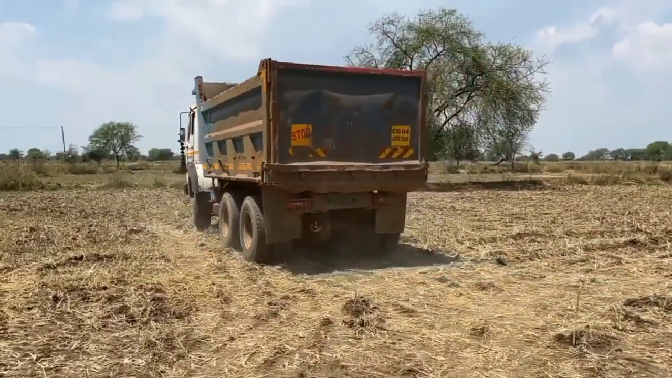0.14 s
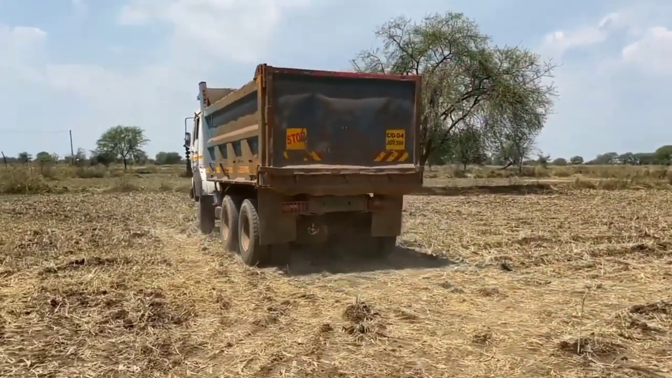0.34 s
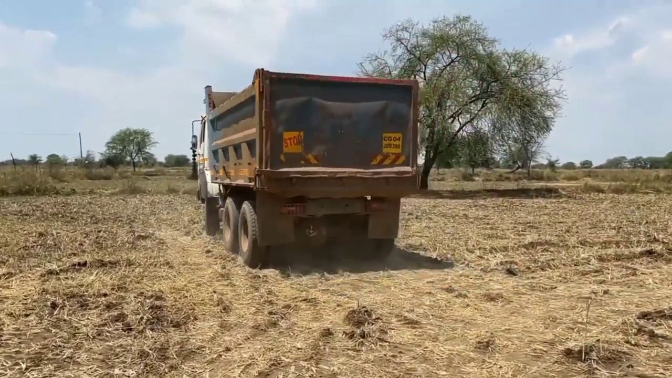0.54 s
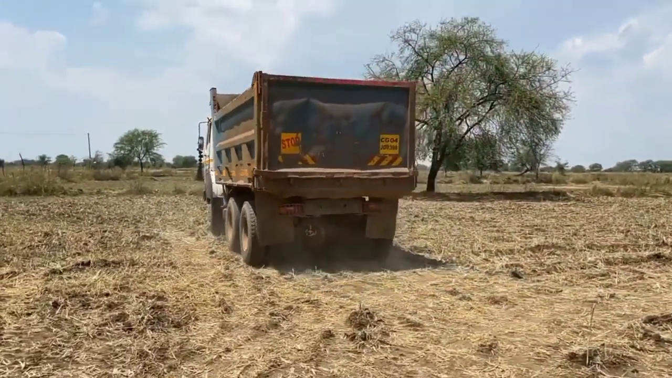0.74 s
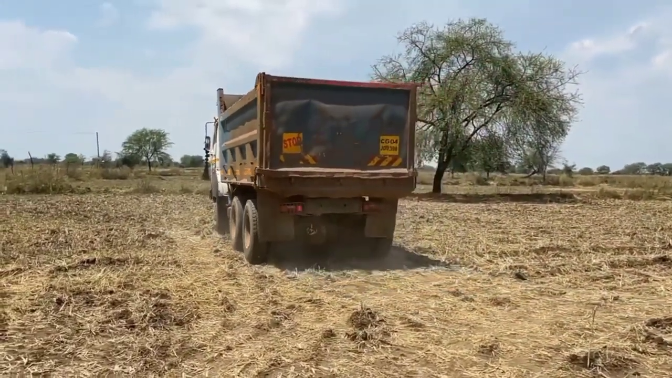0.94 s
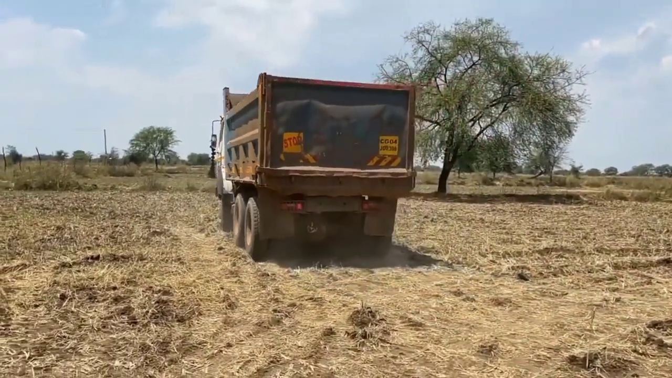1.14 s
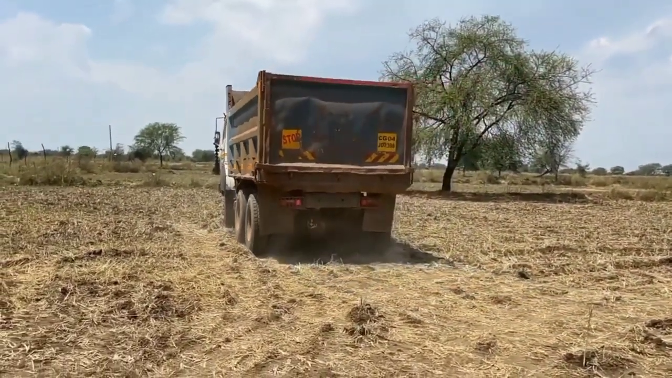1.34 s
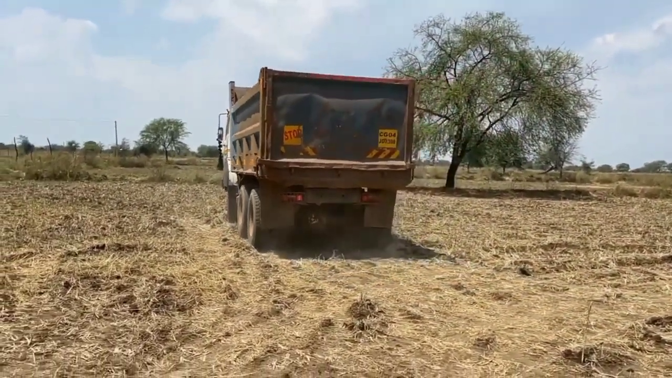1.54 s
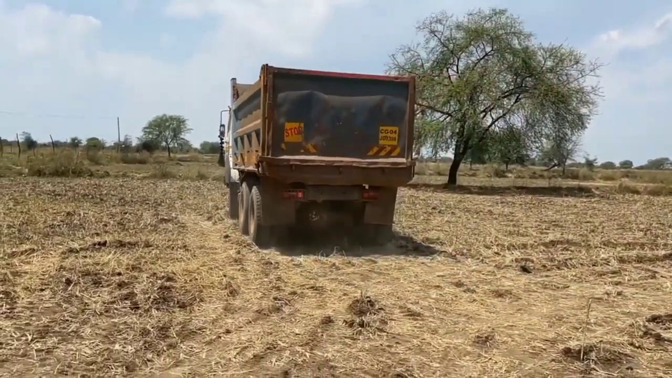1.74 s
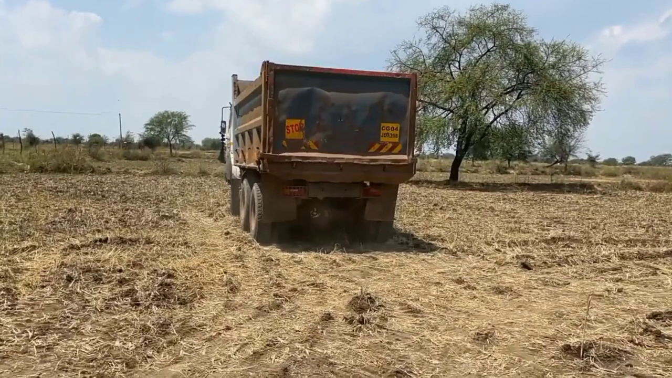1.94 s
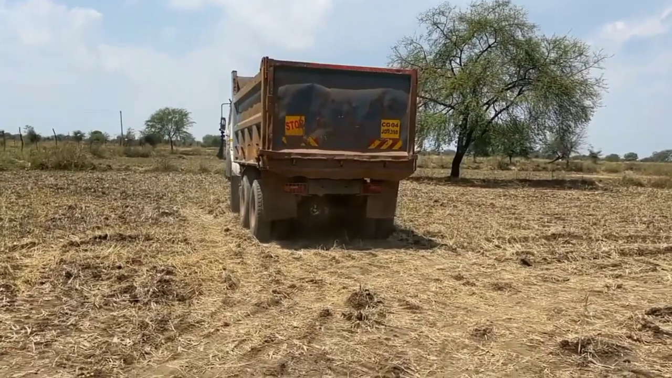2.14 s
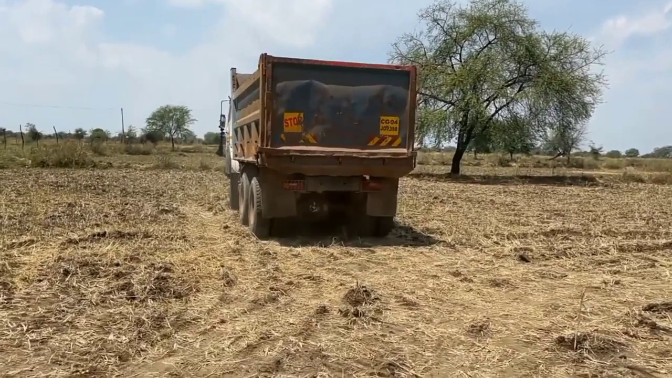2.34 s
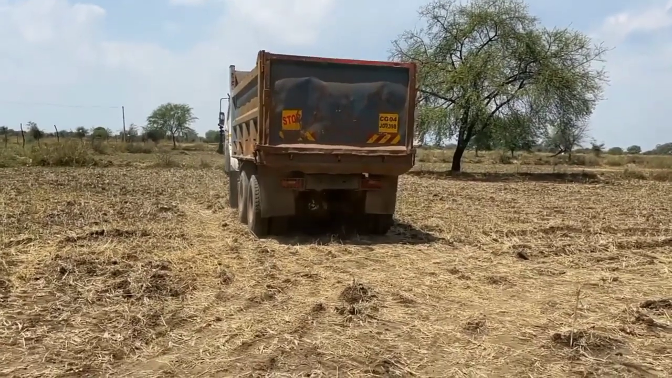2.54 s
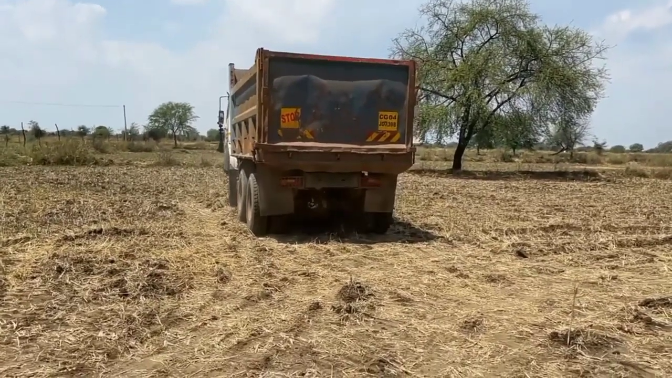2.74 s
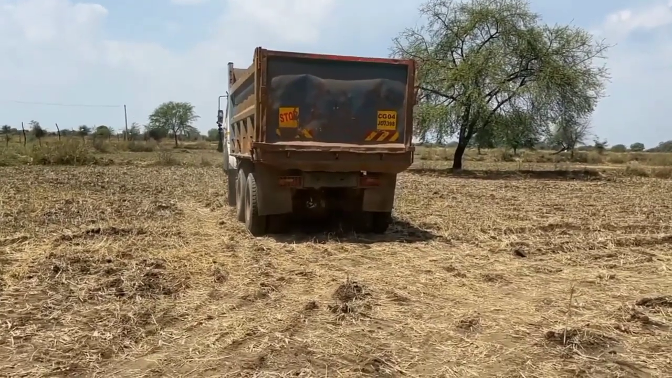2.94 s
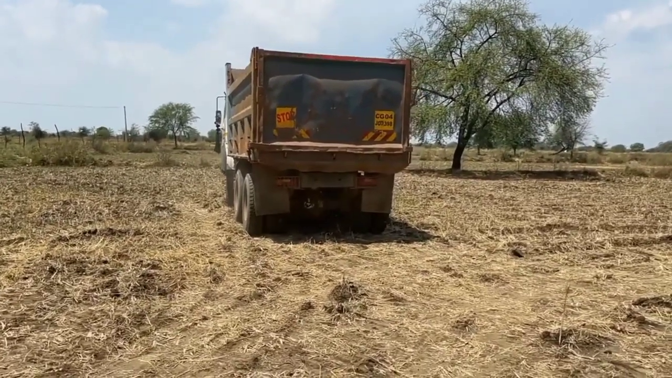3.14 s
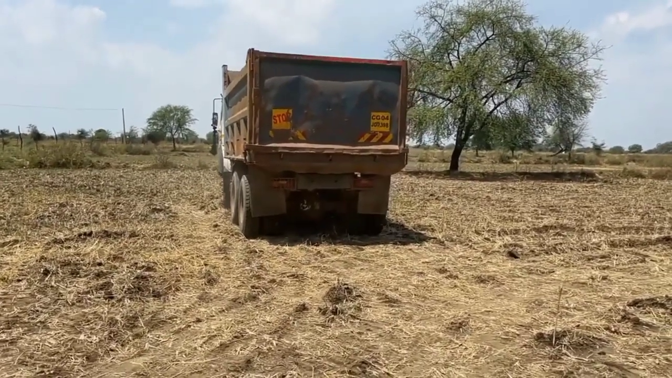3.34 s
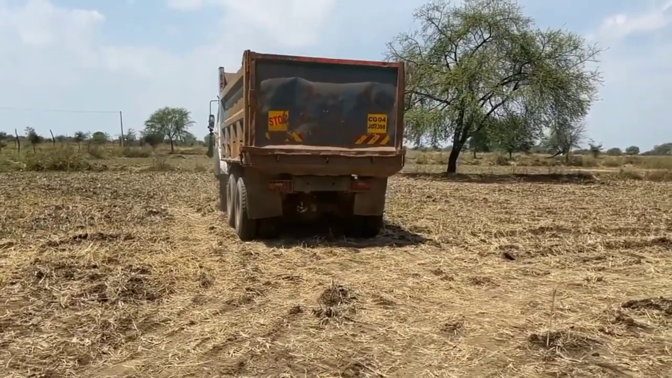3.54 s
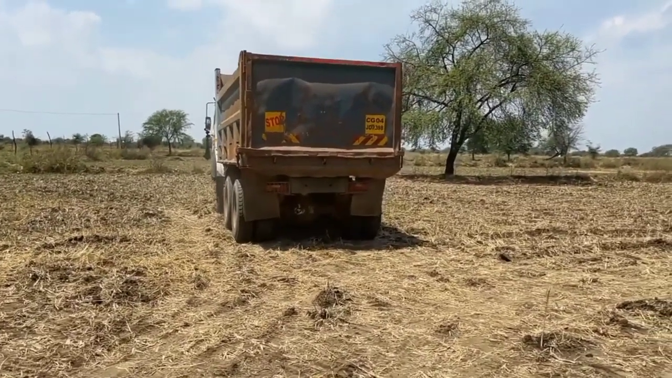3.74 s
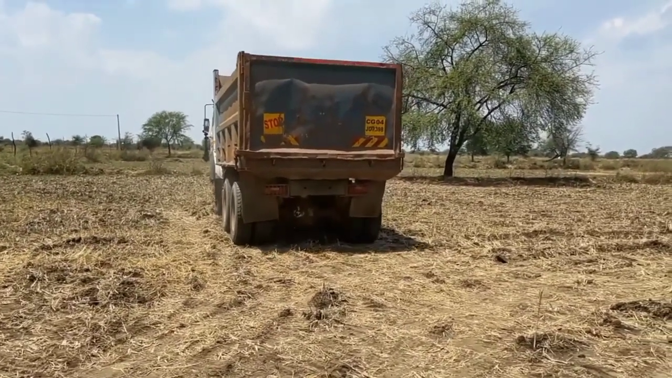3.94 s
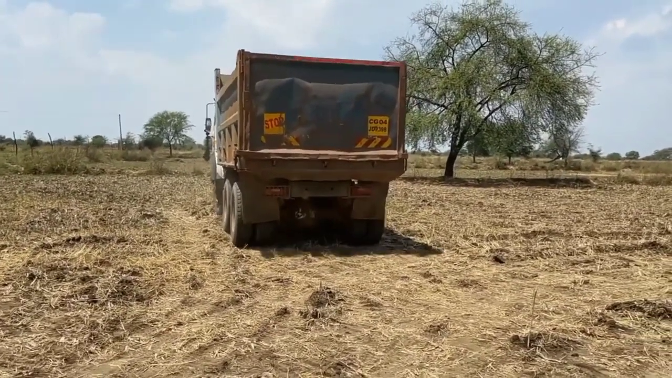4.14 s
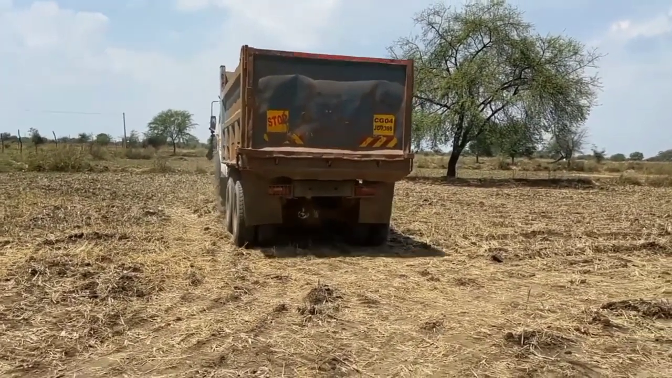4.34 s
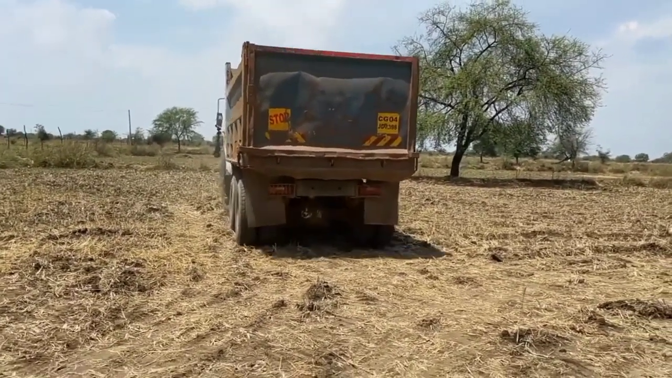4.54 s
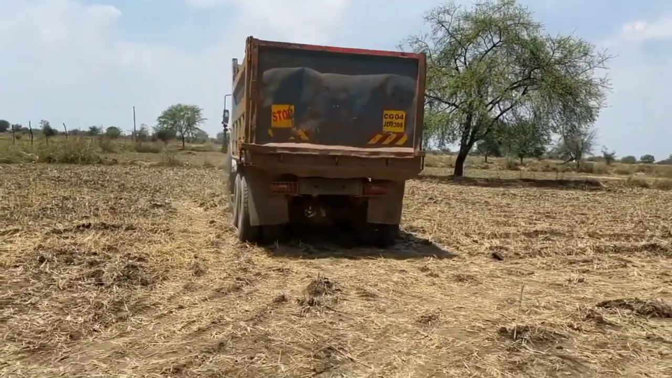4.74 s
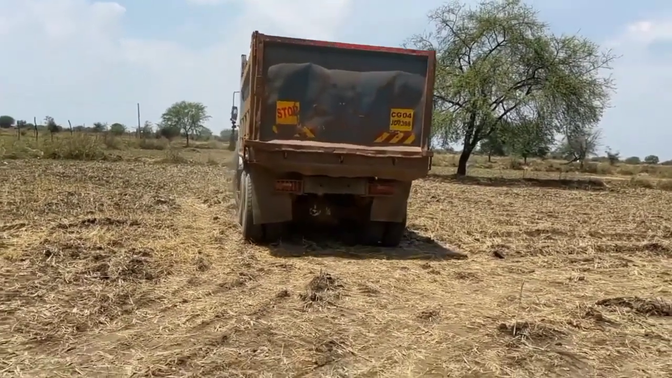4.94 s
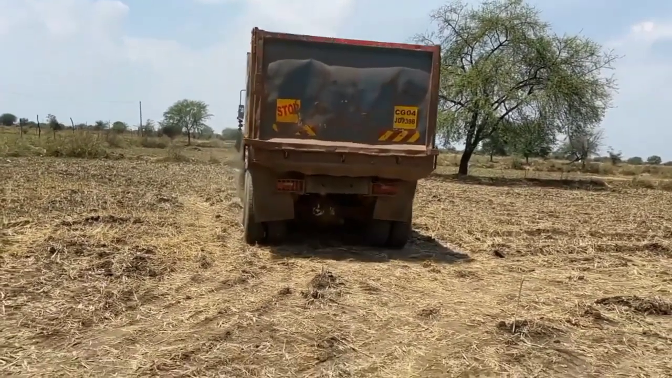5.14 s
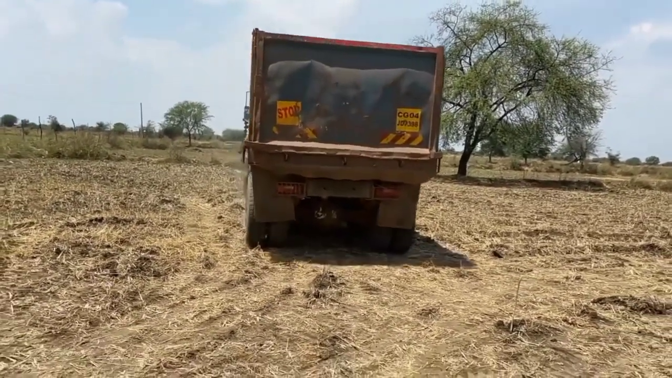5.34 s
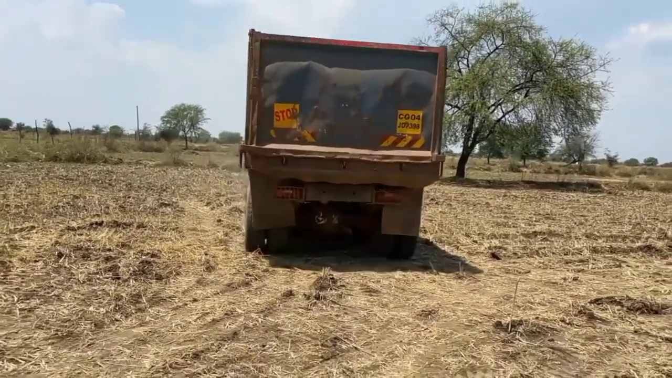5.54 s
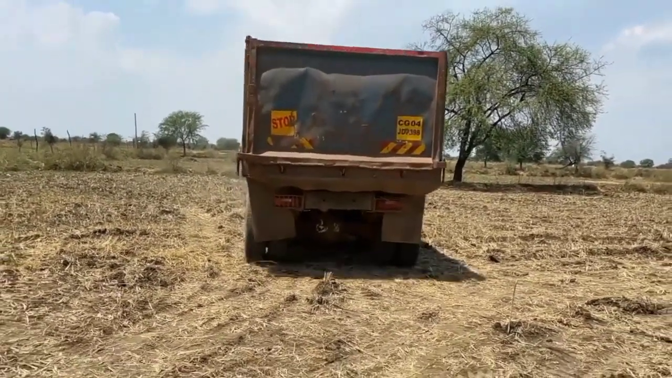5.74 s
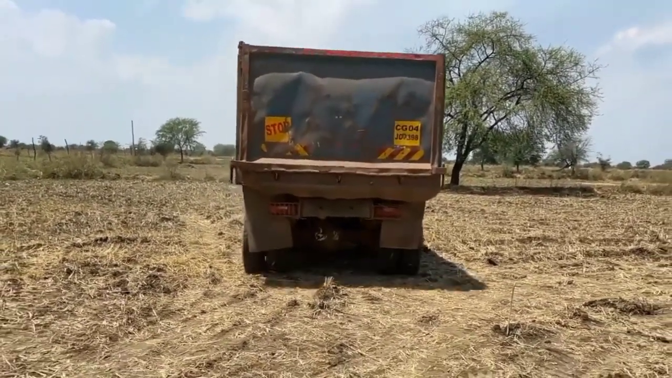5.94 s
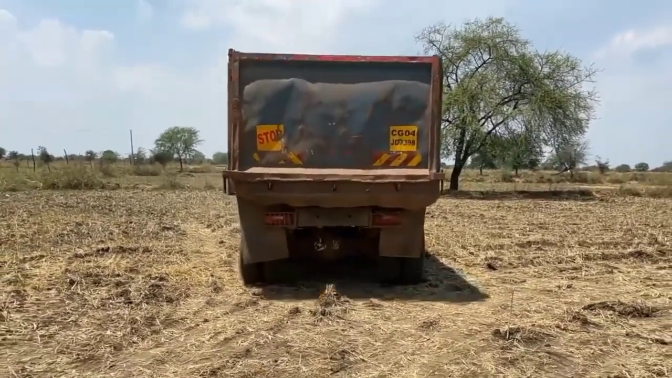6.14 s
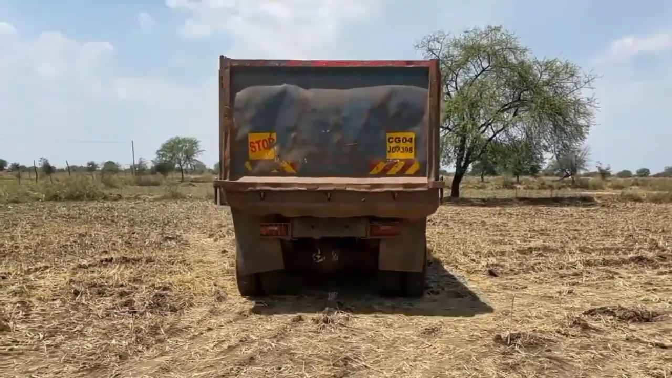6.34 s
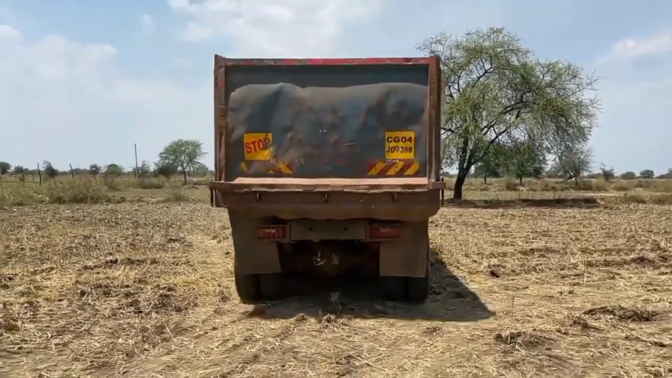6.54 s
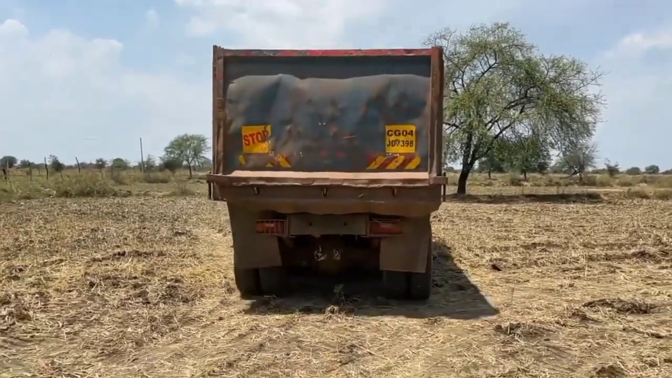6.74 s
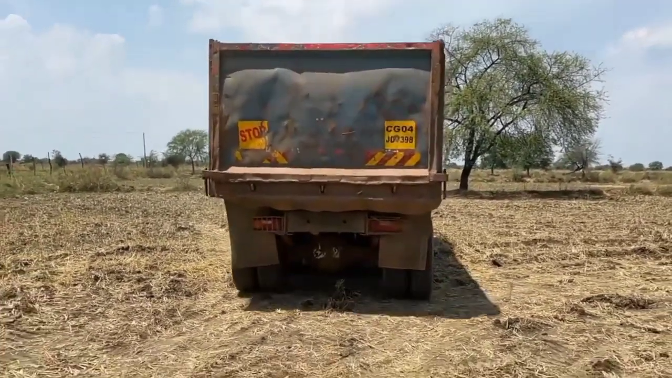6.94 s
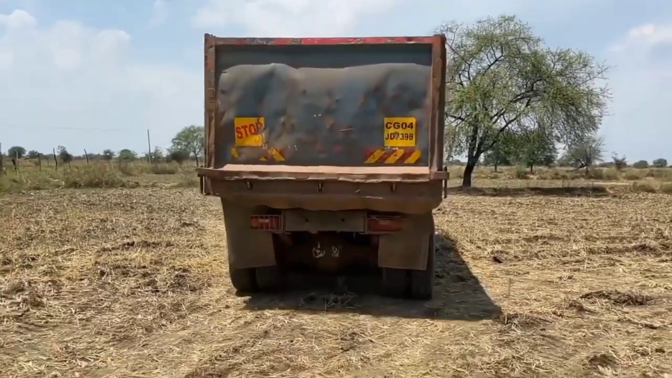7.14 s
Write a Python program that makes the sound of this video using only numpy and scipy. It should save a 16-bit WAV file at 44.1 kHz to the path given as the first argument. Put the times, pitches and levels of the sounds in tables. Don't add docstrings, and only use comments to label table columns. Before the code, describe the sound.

A big diesel truck booms and clatters close by in an open field, panels rattling and dry straw snapping. It eases off and fades, the brake gives a very short squeal, and the engine sinks to a low, slow throb. A metal clank and tailgate bounce follow as reverse engages, then the engine rises again and comes closer. A second engine idles faintly further off. Handheld outdoor microphone, no echo.

```python
import sys
import numpy as np
from scipy import signal
from scipy.io import wavfile
from scipy.ndimage import uniform_filter1d

SR = 44100
rng = np.random.default_rng(int(sys.argv[2]) if len(sys.argv) > 2 else 0)


def volts(x):
    e = np.asarray(x, float) / 20
    return 10 ** e


def put_to_file(sound):
    columns = np.atleast_2d(sound).T
    safe = np.clip(columns, -1, 1)
    whole_steps = np.round(safe * 32767)
    wavfile.write(sys.argv[1], SR, whole_steps.astype(np.int16))


N = 316638
T = np.arange(N) / SR
ROAR_DB, ROAR_SHARE = -36.5, 0.93

# time_s, throttle_db, nearness_db
DRIVING = [(0, -1.5, 2.5), (.96, -1.5, 0), (1.04, -19, -2.5), (1.4, -21, -6), (1.7, -15.5, -6),
           (1.86, -25, -7.5), (2.1, -7, -8), (2.55, -11.5, -11), (2.88, -28, -10.5), (3.1, -1, -5.5),
           (3.7, -11, -6), (3.95, -7, -4.5), (4.86, -2, -1), (5.02, -31, -6), (5.15, -4, -2),
           (5.3, -2.5, -0.5), (5.55, -1.5, 1.5), (5.82, 3, 1.5), (6.55, 3, 4.5), (7.18, -4, 2.5)]
# time_s, pitch_hz, level_db
SQUEAL = [
    (1.75, 1720, -52),
    (1.765, 1735, -41),
    (1.79, 1738, -37),
    (1.814, 1760, -44),
    (1.82, 1930, -38),
    (1.832, 1955, -35),
    (1.848, 1950, -39),
    (1.885, 1942, -48),
    (1.93, 1940, -60),
]


def evened(x):
    return x / np.sqrt(np.mean(x ** 2) + 1e-20)


def curves(rows, t):
    s, *columns = np.transpose(rows)
    return [np.interp(t, s, c) for c in columns]


def add(mix, s, sound):
    part = mix[round(s * SR):][:len(sound)]
    part += sound[:len(part)]


def drift(hz, t=T):
    steps = uniform_filter1d(rng.standard_normal(2000), size=3)
    return evened(np.interp(t * hz * 3, np.arange(2000), steps))


def ring(x, hz, width):
    pole = np.exp((2j * np.pi * hz - np.pi * width) / SR)
    return 2 * signal.lfilter([1 - abs(pole)], [1, -pole], x).real


def resonance(x, hz, width):
    return evened(ring(ring(x, hz, width), hz, width))


def noise(spectrum, patchy_db, size, streak_db=0):
    hz = np.fft.rfftfreq(size, 1 / SR)
    a, b, patches = rng.standard_normal((4 * N // size + 8, len(hz), 3)).T
    streaks = evened(uniform_filter1d(patches[::-1], size=24, axis=1))
    patches = uniform_filter1d(patches, size=8, axis=0)
    patches = evened(uniform_filter1d(patches, size=6, axis=1))
    f, db = np.transpose(spectrum)
    shape = np.interp(np.log(hz + 1), np.log(f + 1), db)[:, None]
    z = (a + 1j * b) * volts(shape + patchy_db * patches + streak_db * streaks)
    return evened(signal.istft(z, nperseg=size, noverlap=3 * size // 4)[1][:N])


def puffs(turns, decay, spread_db):
    strength = volts(spread_db * rng.standard_normal(1000))[turns.astype(int)]
    phase = turns % 1
    return evened(strength * phase * np.exp(-phase / decay))


def truck():
    # frequency_hz, density_db
    roar_spectrum = [(41, -44), (66, -8), (86, -12.5), (107, -18.5), (183, -17), (280, -19.5), (346, -24),
                     (438, -31.5), (620, -27), (810, -53), (1360, -120)]
    # frequency_hz, density_db
    clatter_spectrum = [(260, -45), (450, -2.5), (586, -8.5), (638, -2), (694, 0), (755, -6.5), (852, -7.5),
                        (1140, -5.5), (1670, -12), (2370, -16), (3240, -21), (4600, -22.5), (5920, -30.5),
                        (6840, -29.5), (8000, -34.5), (10400, -49.5), (17600, -120)]
    tones, turns = exhaust()
    near_db = curves(DRIVING, T)[1]

    roar = noise(roar_spectrum, patchy_db=1.5, size=2048)
    roar *= evened(1 + .35 * puffs(turns, .25, spread_db=1.5))
    lurch_db = 0.1 * drift(3)
    roar *= volts(ROAR_DB + ROAR_SHARE * near_db + lurch_db)

    knock = evened(4.5 + 0.19 * puffs(turns, 0.13, spread_db=9.0)) * volts(0.72 * drift(hz=14))
    clatter = noise(clatter_spectrum, patchy_db=2.0, size=1024, streak_db=3.5) * knock
    clatter *= volts(-45 + 0.43 * near_db)
    return tones + roar + clatter


def exhaust():
    # time_s, rate_hz
    speed = [(0, 60.4), (.3, 58.34), (.58, 60.8), (.98, 57.6), (1.06, 55.8), (1.42, 47.5), (1.64, 44.78),
             (1.9, 38.4), (2.5, 36.6), (2.86, 32.9), (3.58, 31.9), (3.76, 39.6), (3.96, 47.7), (4.2, 50.6),
             (4.44, 48.2), (4.88, 48), (5.02, 50.6), (5.16, 52.42), (5.38, 56.58), (5.6, 56.1),
             (5.92, 59.14), (6.3, 60.56), (6.66, 63.7), (6.94, 61.07), (7.18, 59.2)]
    # frequency_hz, gain_db
    pipe = [(32, -28), (36.5, -28), (40, -8), (45, 0.5), (60, 0.5), (80, 6.5), (112, -14.5), (150, -2),
            (185, -9.5), (250, -25)]
    # multiple of firing, full_throttle_db, share of throttle followed, reverse_gain_db
    orders_low = [(1, -21.5, 0.71, 0.5), (2, -29.5, 0.58, 1), (3, -40.5, 0.13, 7.5), (4, -36.5, 0.26, -3)]
    # multiple of firing, level_db over the 3rd order
    orders_high = [(5, -14), (6, -13.5), (7, -19.5)]
    # multiple of firing, level_db over the roar
    orders_weak = [(7 / 6, -13), (8 / 6, 0), (9 / 6, 0), (10 / 6, -5), (11 / 6, -1), (13 / 6, -12),
                   (14 / 6, -6), (16 / 6, 0), (17 / 6, -7), (20 / 6, -14), (21 / 6, -12), (23 / 6, -14),
                   (27 / 6, -13), (33 / 6, -13)]
    weak_db, reverse_s, engage_s = -2.5, 3.28, 0.23

    t = np.arange(N // 10 + 1) * 10 / SR
    hz = curves(speed, t)[0]
    throttle_db, near_db = curves(DRIVING, t)
    reverse = np.clip((t - reverse_s) / engage_s, 0, 1)
    turns = np.cumsum(hz * (1 + .004 * drift(15, t))) * 10 / SR

    orders = []
    for k, db, share, gain_db in orders_low:
        orders.append((k, db + share * throttle_db + gain_db * reverse + curves(pipe, k * hz)[0]))
    third_db = orders[2][1]
    for k, db in orders_high:
        orders.append((k, third_db + db + 2.0 * drift(3.6, t)))

    boom = 0
    for k, db in orders:
        flutter_db = (.6 if k == 1 else 1.4) * drift(9, t)
        throb = 1 + (.1 if k == 1 else .35) * np.cos(2 * np.pi * turns / 6 + k + drift(1, t))
        boom += volts(db + flutter_db) * throb * np.cos(2 * np.pi * k * turns - 2 / k)
    weak = 0
    for k, db in orders_weak:
        weak += volts(db + 3.5 * drift(2, t)) * np.cos(2 * np.pi * (k * turns + rng.random()))
    tones = np.sqrt(2) * boom + volts(ROAR_DB + weak_db + ROAR_SHARE * near_db) * weak
    return signal.resample_poly(tones, up=10, down=1)[:N], np.interp(T, t, turns)


def tailgate():
    # frequency_hz, level_db, t60_s
    gate_modes = [(205, -28.5, 0.24), (265, -29.5, 0.18), (342.1, -31, 0.079), (517, -40, 0.14),
                  (790, -33.5, .14), (1120, -44, 0.11), (1990, -43, .08), (2260, -41, 0.072),
                  (2930, -40, .05), (3600, -47, 0.045), (4317, -52, .04)]
    # start_s, level_db, upper_modes_db
    impacts = [
        (3.868, -5, 5),
        (3.884, 0, -6),
        (3.909, -3, -8),
    ]
    out, t = np.zeros(N), T[:SR // 4]
    for s, db, upper_db in impacts:
        rings = 0
        for hz, rel_db, t60 in gate_modes:
            decay_db = rel_db + (hz > 1000) * upper_db - 60 * t / t60
            rings += volts(decay_db) * np.sin(2 * np.pi * hz * t)
        add(out, s, volts(db) * np.minimum(t / 0.0025, 1) * rings)
    return out


def knocks():
    # start_s, end_s, frequency_hz, width_hz, level_db
    hums = [(0, .7, 360, 33, -42.5), (0, 1.033, 1120, 280, -46), (0, 0.598, 1930, 46, -58.5),
            (0, 0.912, 2310, 190, -56), (0, 1.193, 2240, 930, -60), (0, 0.46, 1380, 51, -63),
            (4, 5.5, 2230, 33, -64), (5.4, 7.8, 2272, 75.2, -76), (5.5, 6.2, 3009, 69.4, -60.5),
            (4.5, 8.7, 950, 54, -60), (3.5, 5.0, 1760, 54.2, -61.5), (5.5, 7.18, 640, 25.7, -50.5),
            (6, 7.18, 747, 40.2, -47.5)]
    # start_s, length_s, frequency_hz, width_hz, level_db
    jolts = [(0, .085, 395, 69, -39), (.2, .15, 108, 25, -33), (.5, .17, 179, 32, -34.5),
             (2.732, .062, 533, 25, -49.5), (3.87, .05, 205, 40, -44), (4.625, .13, 85, 48, -28.5),
             (5.67, .06, 10500, 2500, -65), (6.1, .05, 2000, 900, -54), (6.25, .27, 317, 110, -43),
             (6.396, .02, 4200, 600, -54), (6.425, .035, 2660, 350, -52), (6.6, .16, 125, 50, -33),
             (6.721, .17, 328, 80, -38), (6.74, .07, 2760, 690, -51)]
    # start_s, rise_s, level_db, upper_panels_db
    clanks = [
        (3.865, .018, -3, 4),
        (5.563, .006, -8, 11),
    ]
    # frequency_hz, width_hz, level_db
    body_modes = [(240, 160, -35), (780, 120, -45), (1500, 700, -55), (2300, 700, -54), (3400, 800, -59)]
    # centre_s, peak_db, half_width_s
    bumps = [
        (3.1625, -19, .0012),
    ]

    out, shake = np.zeros(N), rng.standard_normal(N)
    hum_lengths = [(start, end - start, *rest) for start, end, *rest in hums]
    for start, length, hz, width, db in hum_lengths + jolts:
        part = shake[round(start * SR):][:round(length * SR)]
        fade = signal.windows.tukey(len(part), min(.5, .08 / length))
        add(out, start, volts(db) * resonance(part, hz, width) * fade)
    for s, rise, db, upper_db in clanks:
        part, u = rng.standard_normal(SR // 5), T[:SR // 5] / rise
        body = 0
        for hz, width, rel_db in body_modes:
            body += volts(rel_db + (hz > 500) * upper_db) * resonance(part, hz, width)
        add(out, s, volts(db) * u * np.exp(1 - u) * body)
    for s, db, width in bumps:
        u = (T - s) / width
        out += volts(db) * (1 - u ** 2) * np.exp(-u ** 2 / 2)
    return out


def brake():
    # multiple, level_db
    overtones = [(1, 0), (2, -18), (3, -33), (4, -29), (5, -38), (6, -36)]
    t = np.arange(SQUEAL[0][0], SQUEAL[-1][0], 1 / SR)
    hz, db = curves(SQUEAL, t)
    turns = np.cumsum(hz * (1 + 0.0018 * drift(60, t))) / SR
    depth = np.interp(t, [1.84, 1.85], [0, .45])
    stutter = 1 - depth * (1 + np.cos(2 * np.pi * 85 * (t - 1.851)))
    overtone_db = np.minimum(db + 34, 0) / 2
    octave_db = np.interp(t, [1.81, 1.825, 1.865, 1.88, 1.905, 1.915], [1, 0, -2, 10, 11, 0])
    tone = 0
    for k, rel_db in overtones:
        order_db = rel_db + (k > 2) * overtone_db + (k == 2) * octave_db
        tone += volts(order_db) * np.cos(2 * np.pi * k * turns)
    level = np.sqrt(2) * volts(db + 2.2 * drift(70.3, t))
    return level * stutter * tone * signal.windows.tukey(len(t), .1)


def stubble():
    # frequency_hz, density_db
    rustle_spectrum = [(5000, -41), (7500, -27.5), (8400, -13), (9000, -7), (9900, -2.5), (12200, -7),
                       (13300, -11), (13900, -56), (16000, -80.5)]
    # start_s, peak_db, upper_ring_hz, lower_ring_db
    snaps = [(.1346, -43, 10600, -18), (.304, -45, 10100, -7), (.4005, -48, 10980, -10),
             (0.816, -32.5, 9700, 7), (0.832, -51, 8800, 17), (.8654, -46, 8000, -20),
             (.977, -40, 11500, -6), (0.982, -45, 11500, 8), (1.0396, -24, 10100, -3),
             (1.0447, -29, 11200, -12), (1.061, -38.5, 11000, 10.5), (1.0724, -48.5, 9640, 15),
             (1.3119, -57, 11500, -10), (2.0507, -51, 10300, -5), (2.221, -41.5, 11470, 2),
             (2.7038, -50, 8500, -13), (2.7487, -61, 8650, -6), (2.7982, -35, 8800, -26),
             (3.2894, -57, 10150, -4), (4.129, -61, 8037, 2.5), (4.162, -53, 8130, 11),
             (4.2328, -57, 10990, -5), (4.2921, -57, 10900, -5), (4.3101, -48, 11000, -2),
             (4.3485, -58, 10500, -5), (4.8753, -54, 12500, -7), (5.2525, -41, 10090, -15),
             (5.5447, -53, 11530, -3), (5.5672, -49, 10000, 11), (5.657, -54, 12000, -9),
             (5.778, -54, 13000, -12), (5.7848, -43, 12100, -16), (6.207, -36, 10620, 1),
             (6.2357, -49, 10710, -13), (6.3906, -46, 9976, -2), (6.571, -50, 12980, -7.5),
             (7.0252, -47, 9620, -7), (.8212, -41.5, 9700, 11)]
    # peak_db, t60_s
    snap_decay = [(-57, 0.013), (-46, 0.027), (-32, 0.021)]
    crack_db, crack_s = 5, .0005

    near_db = curves(DRIVING, T)[1]
    grains = volts(3.5 * rng.exponential(1, N)) * (rng.random(N) < 150 / SR)
    crackle = evened(uniform_filter1d(signal.lfilter([1], [1, -.99], grains), size=40))
    rustle = noise(rustle_spectrum, patchy_db=1.5, size=512, streak_db=2.0)
    rustle *= volts(-71.5 + .5 * near_db) * evened(1 + 0.28 * crackle)
    coarse = uniform_filter1d(rustle, size=3)
    out = coarse + (rustle - coarse) * volts(.65 * near_db)

    t = np.arange(3000) / SR
    for s, db, hz, low_db in snaps:
        burst = rng.standard_normal(3000)
        rings = resonance(burst, hz, 3500) + volts(low_db) * resonance(burst, 6000, 3800)
        decay = volts(db - 9.5 - 60 * t / curves(snap_decay, db)[0])
        add(out, s, decay * rings * np.minimum(t / 0.00026, 1))
        crack = evened(np.diff(burst, n=4, prepend=np.zeros(4)))
        add(out, s, volts(db - 10.5 + crack_db) * np.exp(-t / crack_s) * crack)
    return out


def idler():
    # frequency_hz, density_db
    wash_spectrum = [(40, -7), (80, -4.5), (150, 6.5), (190, -15), (300, -18), (500, -28), (790, -21.5),
                     (1000, -22.5), (2300, -27), (3360, -49.5), (4600, -41.5), (7000, -51), (8200, -64),
                     (12000, -100)]
    # frequency_hz, width_hz, level_db
    valve_rings = [(4480, 1200, 0.5), (6330, 2200, -6), (2220, 110, -7)]
    # frequency_hz, level_db
    gear_whines = [(170, -50), (737.5, -55), (808, -55), (2918, -74), (2977, -75), (1650, -72)]
    turns = 28.33 * T + .16
    ticks = puffs(turns, .13, spread_db=2) * noise([(7300, 0), (8200, -40)], patchy_db=1.5, size=512)
    valves = sum(volts(db) * resonance(ticks, hz, width) for hz, width, db in valve_rings)
    wash = noise(wash_spectrum, patchy_db=2.5, size=1024, streak_db=3)
    wash *= evened(-1.5 + 0.072 * puffs(turns, 0.25, spread_db=5))
    whine = 0
    for hz, db in gear_whines:
        phase = 2 * np.pi * np.cumsum(hz + .7 * drift(4)) / SR
        whine += volts(db + 1.3 * drift(5)) * np.cos(phase)
    return volts(-40) * wash + volts(-65.5) * valves + np.sqrt(2) * whine


def scene():
    mix = truck() + tailgate() + knocks() + stubble() + idler()
    add(mix, SQUEAL[0][0], brake())
    return mix[None]


def thinned(x):
    # frequency_hz, share of the time
    silenced = [(2900, 0), (3300, .03), (3700, 0), (5500, .01), (6000, .05), (7400, .02), (8500, .3),
                (9500, .05), (12000, .08), (13300, .3), (13800, .86), (16000, .88)]
    hz, _, z = signal.stft(np.pad(x, (0, 2048), "reflect"), SR, nperseg=1024, boundary="even")
    power = uniform_filter1d(abs(z) ** 2, size=6, axis=0)
    power = uniform_filter1d(power, size=6, axis=1)
    level = np.log(power + 1e-30)
    calm = np.minimum(level, np.median(level, axis=1)[:, None] + 1)
    level -= .75 * uniform_filter1d(calm, size=60, axis=1)
    rank = level.argsort(axis=1).argsort(axis=1) / level.shape[1]
    kept = rank >= np.interp(hz, *np.transpose(silenced))[:, None]
    return signal.istft(z * kept, SR, nperseg=1024)[1][:N]


def band_limit(x):
    return signal.sosfilt(signal.butter(12, 15390, fs=SR, output="sos"), x)


def record(dry):
    high_pass = signal.butter(4, 35, "high", fs=SR, output="sos")
    steady = signal.sosfilt(high_pass, dry[0])
    rounded = .7 * np.tanh(steady / .7)
    low_pass = signal.ellip(8, .1, 50, 15300, fs=SR, output="sos")
    limited = signal.sosfiltfilt(low_pass, thinned(rounded))
    closing = np.sin(np.pi / 2 * np.minimum(T[::-1] / .006, 1)) ** 2
    return band_limit((limited * closing)[None])


dry = scene()
out = record(dry)
put_to_file(out)
```